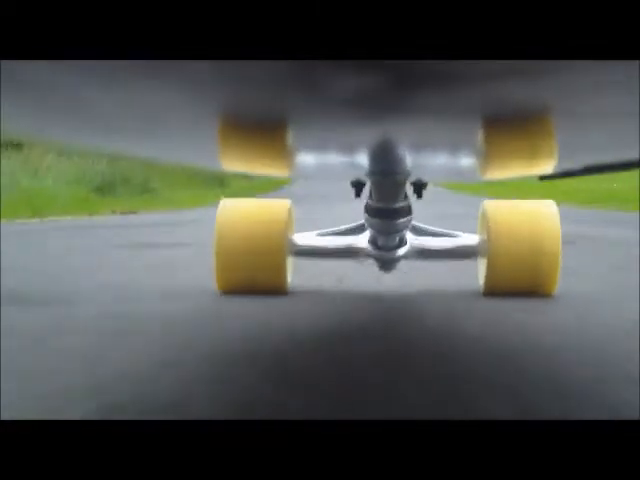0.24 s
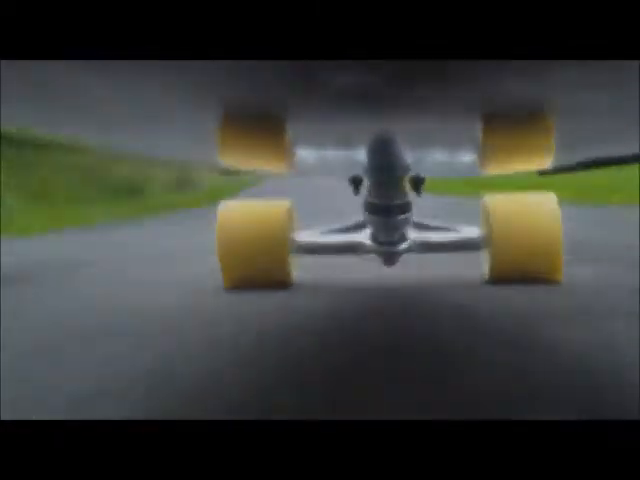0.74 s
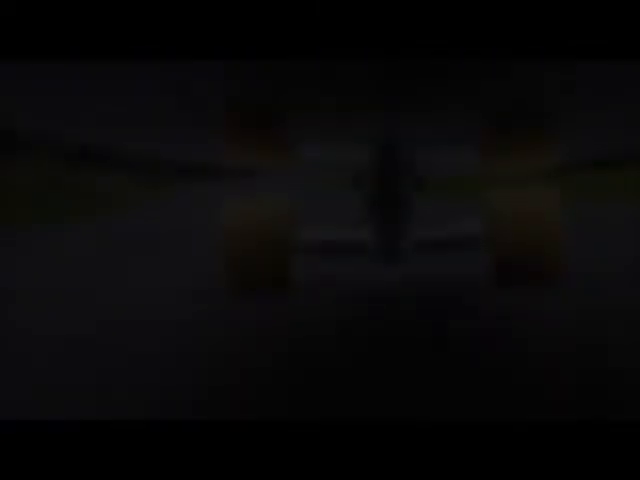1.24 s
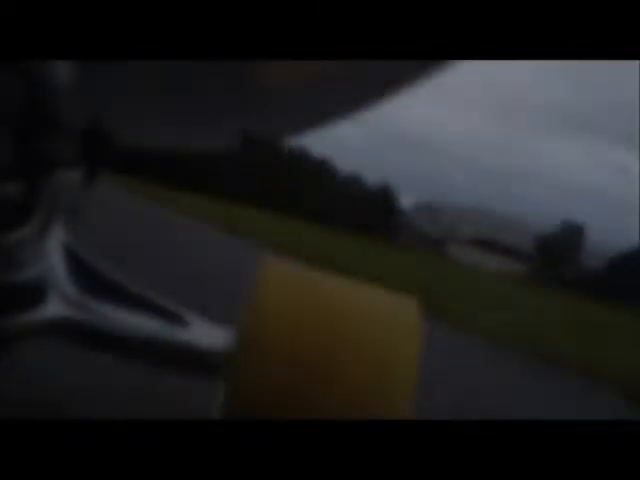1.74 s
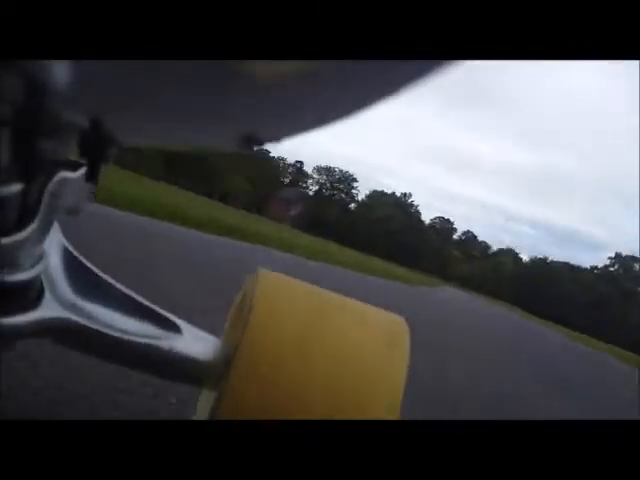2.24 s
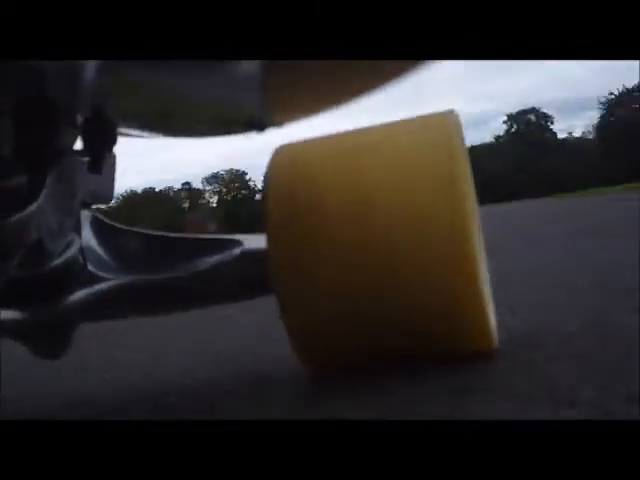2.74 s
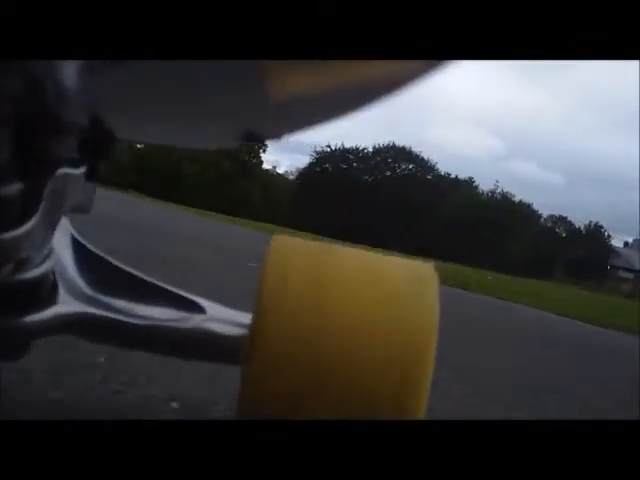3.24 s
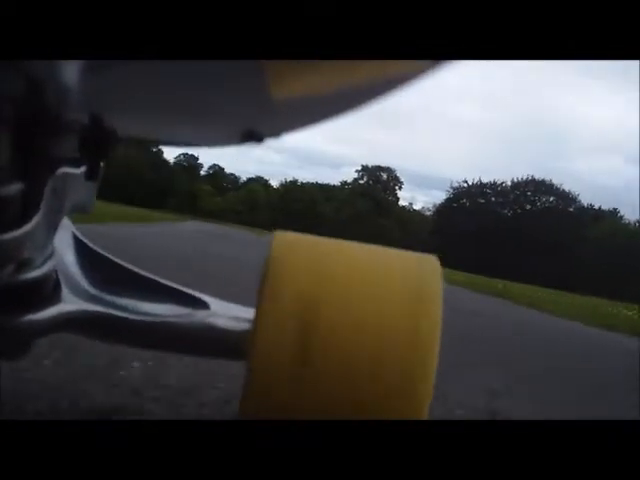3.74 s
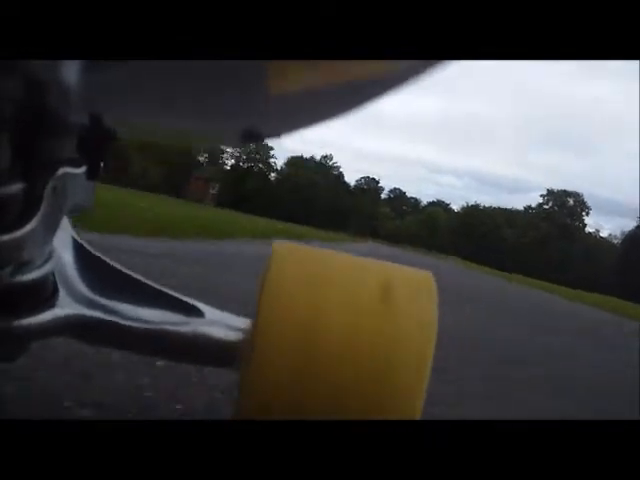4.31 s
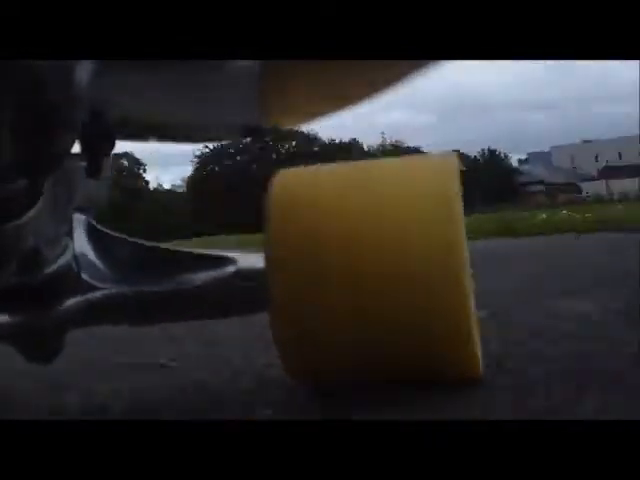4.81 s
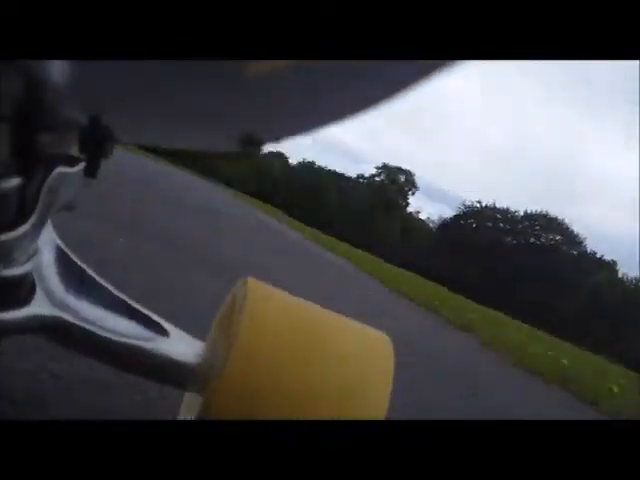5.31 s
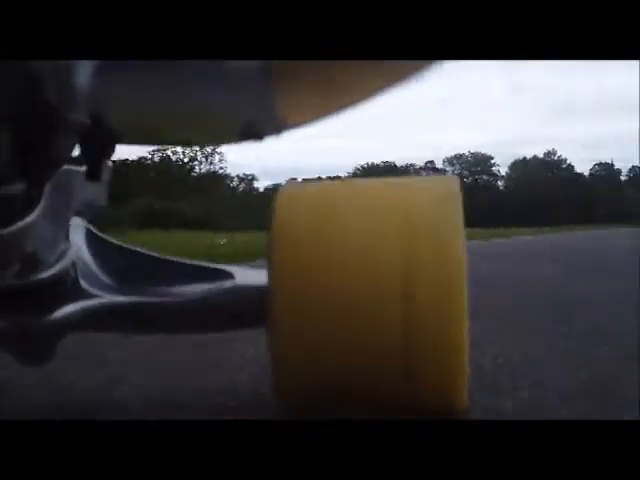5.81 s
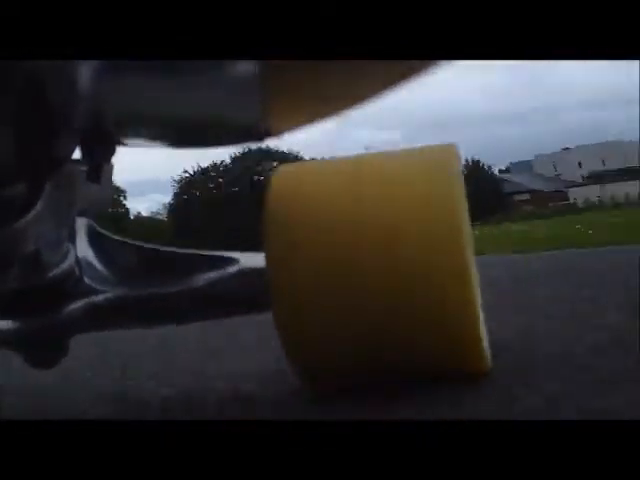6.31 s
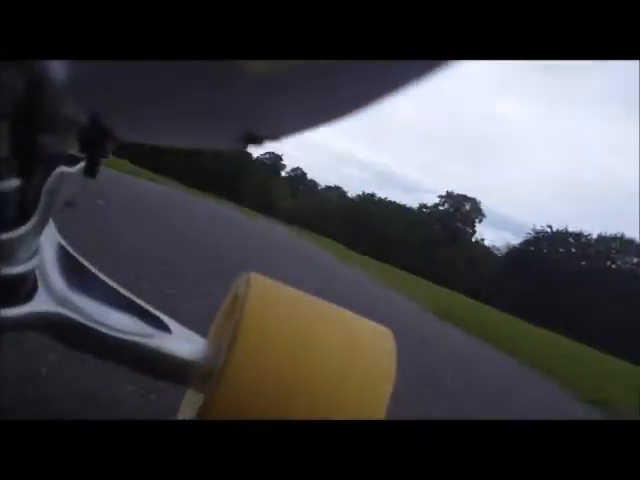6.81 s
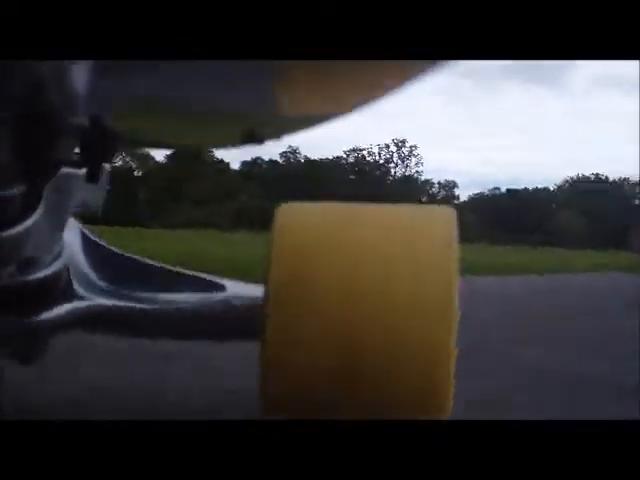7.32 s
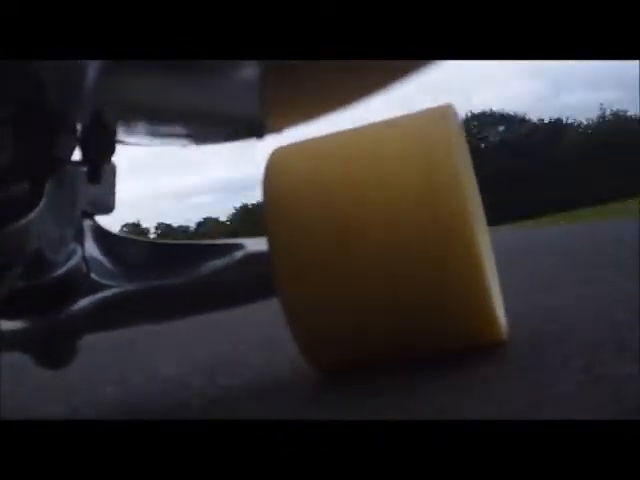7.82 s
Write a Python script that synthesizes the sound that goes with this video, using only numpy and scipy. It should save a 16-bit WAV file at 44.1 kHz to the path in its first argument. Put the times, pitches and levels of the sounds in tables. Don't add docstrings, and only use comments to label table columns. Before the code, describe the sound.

A close, rough rolling roar of a skateboard on pavement, knocking over bumps, then turning duller and surging in waves as it carves.

```python
import sys
import numpy as np
from scipy import signal
from scipy.fft import rfft, irfft
from scipy.io import wavfile

SR = 44100
rng = np.random.default_rng(int(sys.argv[2]) if len(sys.argv) > 2 else 0)


def rack_gain(trim_db):
    fader = np.asarray(trim_db, float)
    return 10 ** (fader / 20)


def materialize(psi):
    bounded = np.clip(np.atleast_2d(psi).T, -1, 1)
    quanta = np.round(bounded * 32767).astype(np.int16)
    wavfile.write(sys.argv[1], SR, quanta)


N = 355446
TIME_S = np.arange(N) / SR
UNDER_DECK = TIME_S < 2.179

# f/Hz, width/Hz, level/dB
DECK_RING_UNDER = [(132.6, 21, -2), (147.6, 25.6, -3), (211.7, 43, -9), (235, 18, -5.5), (299, 150, -10)]
# f/Hz, width/Hz, level/dB
DECK_RING_BESIDE = [(131.6, 39.5, -2.5), (159.8, 67, -1), (204, 86, -3.5), (300, 100, -10.5)]
# f/Hz, width/Hz, level/dB
TRUCK_RING_UNDER = [(375, 38.5, -3.5), (449.5, 47, -2), (547, 75, -5), (710, 120, -11.5), (816, 190, -15.5)]
# f/Hz, width/Hz, level/dB
TRUCK_RING_BESIDE = [(418, 190, -4.5), (548, 150, 2), (691, 383, -5.5)]


def rms_one(x):
    return x / np.sqrt(np.mean(x ** 2) + 1e-20)


def in_time(rows):
    s, *columns = np.transpose(rows)
    return [np.interp(TIME_S, s, c) for c in columns]


def at_hz(points, hz):
    f, db = np.transpose(points)
    return np.interp(np.log(hz), np.log(f), db)


def drift(rate_hz):
    r = np.exp(-80 * np.pi * rate_hz / SR)
    noise = rng.standard_normal(N // 40 + 2002)
    slow = signal.lfilter([1], [1, -2 * r, r * r], noise)[2000:]
    return np.interp(np.arange(N) / 40, np.arange(len(slow)), rms_one(slow))


def band(x, low_hz, high_hz):
    sos = signal.butter(2, [low_hz, min(high_hz, 19000)], "band", fs=SR, output="sos")
    return signal.sosfilt(sos, x)


def resonance(x, hz, width_hz):
    r = np.exp(-np.pi * width_hz / SR)
    gain = (1 - r * r) / 2
    return signal.lfilter(np.array([1, 0, -1]) * gain, [1, -2 * r * np.cos(2 * np.pi * hz / SR), r * r], x)


def body(push, modes):
    total = 0
    for k, (hz, width_hz, db) in enumerate(modes):
        total = total + (-1) ** k * rack_gain(db) * resonance(push, hz, width_hz)
    return total


def stones(per_s, spread_db):
    sizes = rack_gain(spread_db * np.minimum(rng.exponential(1, N), 5))
    signs = rng.choice([-1, 1], N)
    hits = rng.random(N) < per_s / SR
    return rms_one(sizes * signs * hits)


def by_mount(under, beside):
    return np.where(UNDER_DECK, rms_one(under), rms_one(beside))


def mount_db(under_db, beside_db):
    return np.where(UNDER_DECK, under_db, beside_db)


def board(flex_db, truck_db, scrape_db, coarse):
    # f/Hz, width/Hz, level/dB
    scrape_under = [(840, 270, 3), (1204, 236, 3), (1400, 127, 3), (2210, 300, -8)]
    # f/Hz, width/Hz, level/dB
    scrape_beside = [(945, 114, 13.5), (1306, 750, 3)]
    road = stones(2200.0, 2.95) * rack_gain(0.5 * coarse)
    low = band(road, 65.0, 305.0)
    mid = band(road, 244.0, 988.0)
    fine_contacts = 3.7 * stones(2500.0, 2.8)
    high = band(road + fine_contacts, 715.0, 4200.0) * rack_gain(1.4 * drift(46.0))
    flex = by_mount(body(low, DECK_RING_UNDER), body(low, DECK_RING_BESIDE))
    truck = by_mount(body(mid, TRUCK_RING_UNDER), body(mid, TRUCK_RING_BESIDE))
    scrape = by_mount(body(high, scrape_under), body(high, scrape_beside))
    rasp = rms_one(band(high, 1570.0, 2430.0)) * ~UNDER_DECK
    rasp_db = -39.0 + 1.26 * (scrape_db + 34.0)
    ringing = rack_gain(flex_db) * flex + rack_gain(truck_db) * truck
    return ringing + rack_gain(scrape_db + 3.0) * scrape + rack_gain(rasp_db) * rasp


def grit(hiss_db, bright_db, coarse):
    # f/Hz, level/dB
    colour_under = [(1200, -4), (1900, -9.5), (3300, -6), (4300, -9), (5000, -12), (6500, -3), (9000, -3.5),
                    (10500, -1.5), (12500, -11.5), (15000, -17)]
    # f/Hz, level/dB
    colour_beside = [(1200, -27), (2000, -13), (3500, -10.5), (4400, -13), (5100, -14.5), (6200, -10.5),
                     (9000, -8.5), (10500, -8), (12500, -13), (15000, -21)]
    under, beside = 0, 0
    edges_hz = 1400 * 2 ** np.arange(0, 3.7, 1 / 4)
    grains = [stones(14000.0, 3.35) for _ in range(2)]
    shake_db = 0.6 * coarse + 1.3 * drift(45.0)
    for k, (low, high) in enumerate(zip(edges_hz, edges_hz[1:])):
        hz = np.sqrt(low * high)
        tilt_db = bright_db * np.clip(np.log2(hz / 5140.0), 0, 2)
        hiss = band(grains[k % 2], low, high) * rack_gain(tilt_db + 0.54 * drift(4.7))
        under = under + hiss * rack_gain(at_hz(colour_under, hz))
        beside = beside + hiss * rack_gain(at_hz(colour_beside, hz))
    return rack_gain(hiss_db + 5.0 + shake_db) * by_mount(under, beside)


def bumps():
    # t/s, peak level/dB, push (1 up, -1 down)
    bump_list = [(0.0408, -3.1, 1), (0.14, -1.7, -1), (0.3786, -2.8, 1), (0.5973, -3.0, -1),
                 (1.1363, -1.6, -1), (1.4093, -4.1, -1), (2.0043, -0.5, 1), (2.1389, -1.1, -1),
                 (2.3063, -8.3, -1), (2.3958, -8.3, -1), (2.6105, -3.0, -1), (3.0598, -4.3, -1),
                 (3.2832, -3.2, -1), (3.7784, -6.0, -1), (3.8867, -5.1, 1), (3.9335, -5.8, -1),
                 (4.3603, -5.5, 1), (4.6169, -6.3, 1), (5.7626, -7.2, -1), (5.8234, -6.6, -1),
                 (6.3317, -4.7, 1), (6.4169, -5.6, -1), (6.8702, -2.4, 1), (6.9221, -2.8, -1),
                 (7.0308, -3.5, 1), (7.1771, -8.2, -1), (7.6197, -4.0, -1), (7.6581, -3.7, -1),
                 (7.7191, -3.5, -1), (7.8362, -5.1, 1)]
    push = np.full(N, 1e-18)
    for s, peak_db, direction in bump_list:
        push[round(s * SR)] = rack_gain(peak_db - 3.0) * np.sign(direction)
    push = np.convolve(push, np.hanning(72))[:N]
    push = signal.sosfilt(signal.butter(2, 110.0, "high", fs=SR, output="sos"), push)
    ring_under = body(push, [*DECK_RING_UNDER, *TRUCK_RING_UNDER])
    ring_beside = body(push, [*DECK_RING_BESIDE, *TRUCK_RING_BESIDE])
    return push + rack_gain(-1.5) * np.where(UNDER_DECK, ring_under, ring_beside)


def ticks():
    # t/s, knock level/dB, crack level/dB
    tick_list = [(0.0844, -35, -33), (0.13, -19, -29), (0.68, -32, -29), (0.8034, -7, -32),
                 (0.855, -20, -34), (1.0076, -18, -13), (1.0644, -36, -29), (1.297, -29, -26),
                 (1.329, -17, -16), (1.9494, -35, -30), (2.646, -38, -19), (2.6773, -23, -13.5),
                 (2.7115, -16, -36), (2.934, -14, -32), (2.9944, -14, -30), (3.059, -16, -32),
                 (4.716, -16, -41), (4.753, -20, -41), (4.8573, -18, -56), (5.8856, -13.5, -41),
                 (6.1554, -16, -37), (6.382, -14, -42), (6.416, -16, -44), (6.5566, -16, -37),
                 (6.7017, -8, -34), (7.298, -20, -43), (7.5587, -18, -37), (7.715, -24, -33),
                 (7.834, -13, -30), (7.902, -20, -35)]
    length = 900
    out, t = np.zeros(N + length), np.arange(length) / SR
    for s, knock_db, crack_db in tick_list:
        noise = rng.standard_normal(length)
        burst = (noise + 4 * (t == 0)) * np.exp(-t / 0.0011)
        rattle = burst + rack_gain(-14) * noise * np.exp(-t / 0.0075)
        layers = [
            (knock_db - 4.0, band(rattle, 600.0, 2200.0)),
            (knock_db - 5.0, band(rattle, 2200.0, 4300.0)),
            (crack_db + 8.5, band(np.gradient(burst), 7600.0, 11000.0)),
            (crack_db - 2.0, band(burst, 12000.0, 16000.0)),
        ]
        at = round(s * SR)
        for db, part in layers:
            out[at:at + length] += rack_gain(db) * part / np.abs(part).max()
    return out[:N]


def whine():
    # t/s, level/dB
    bearing_level = [(0.03, -47), (1.0, -46), (2.2, -57), (3.1, -49), (3.4, -43.5), (4.4, -46.5),
                     (4.9, -61), (5.2, -46), (6.2, -62), (6.8, -42), (7.2, -63), (8.04, -58)]
    whine_db, = in_time(bearing_level)
    tone = rng.standard_normal(N) * rack_gain(2.2 * drift(25.0))
    for _ in range(2):
        tone = resonance(tone, 5800, 700)
    return rack_gain(whine_db) * rms_one(tone)


def wind():
    # t/s, level/dB
    air_level = [(0.06, -53), (0.88, -50), (1.0, -36), (1.66, -40), (2.21, -29), (2.39, -48), (2.79, -30),
                 (3.75, -37), (3.93, -29), (4.55, -32), (4.7, -22.5), (4.99, -45), (5.13, -31), (5.66, -31),
                 (6.15, -35), (7.15, -30), (7.35, -43), (8.04, -29)]
    wind_db, = in_time(air_level)
    lumps = band(rng.standard_normal(N), 53.0, 210.0) * rack_gain(0.33 * drift(12.0))
    return rack_gain(wind_db + 3.0) * rms_one(lumps)


def patches():
    # centre t/s, length/s, deck/dB, tread/dB
    patch_list = [(0.042, 0.11, -5.5, -2), (0.2, .2, 0, 0.5), (0.29, 0.15, 0, 2.5),
                  (0.45, 0.21, -1.5, -1.5), (0.806, 0.035, 1.5, 2), (0.87, 0.11, 4.5, 0),
                  (1.017, 0.12, 6.5, 4.5), (1.134, 0.22, 1, 7.5), (1.25, .08, 2.5, 3),
                  (1.313, 0.084, 5, 9.5), (1.594, 0.2, 1.5, 0.3), (1.826, 0.087, 4.5, 3),
                  (2.145, 0.043, 2, 1.5),
                  (2.52, 0.35, -2, 0.5), (2.76, 0.17, 4, 3), (3.06, 0.1, 2, 3), (3.17, 0.11, -3.5, 2.5),
                     (3.42, 0.084, 4, 0), (3.65, 0.062, -5, -4), (3.7, 0.047, 2, 1), (4.05, 0.052, -10, -3),
                     (4.385, 0.094, 9.5, 8), (4.456, .07, 11, 4), (4.53, 0.036, 6, 6), (4.63, 0.11, 2, 2.5),
                     (4.73, 0.046, -11, 4), (4.92, 0.055, 0.1, 3), (5.01, 0.2, 4, 0),
                     (5.15, 0.041, -2.5, 8), (5.33, 0.12, -1.5, 4), (5.43, 0.079, 0, 3),
                     (5.53, 0.066, 4, 5), (5.87, 0.083, 1.5, 1.5), (6.5, 0.13, -2, -1.5),
                     (6.7, 0.035, 4, 2), (6.86, 0.059, 4.5, 7), (7.0, 0.28, 4, 4), (7.152, 0.056, -4, 2),
                     (7.3, 0.026, -1.5, 2), (7.56, 0.056, 7.5, 4), (7.598, 0.035, -16, -2),
                     (7.69, .1, 8, 1.5), (7.835, 0.037, 9, 0)]
    out = np.zeros((2, N))
    for s, length_s, *db in patch_list:
        passed = (TIME_S - s) / max(length_s, 0.01) + 0.47
        rise, fall = passed / 0.32, (1 - passed) / 0.54
        out += np.outer(db, np.clip(np.minimum(rise, fall), 0, 1))
    return out


def seam():
    since_s = TIME_S - 7.131
    return -4 * (since_s > 0) * np.exp(-np.abs(since_s) / 0.26)


def scene():
    # t/s, level/dB
    road_level = [(0.03, 2), (0.62, -0.5), (0.74, 1.5), (1.33, -2), (1.38, -3), (2.17, 2.5), (2.25, -1.5),
                  (2.77, 0.5), (3.85, 0.5), (4.1, -3), (5.0, -6.5), (5.2, 0), (5.72, -4), (6.2, 0.5),
                  (7.12, -0.5), (7.42, -8.5), (7.66, -1), (8.04, -3)]
    # t/s, level/dB
    carve_level = [(1.1, -1), (2.17, 2), (2.25, -3), (2.5, -7.5), (2.77, 0.5), (3.3, 3.5), (3.65, -2.5),
                   (4.15, -2), (4.9, 3), (5.05, -1.5), (5.3, 7), (5.54, 7), (5.72, -4), (6.0, 1), (6.92, 4),
                   (7.15, -5.5), (7.7, 6), (8.04, 1.5)]
    # t/s, amount/dB, fineness/dB
    dust_level = [(0.03, -1, -2.5), (1.15, 0, -2.5), (1.5, -0.5, -2.5), (2.17, 1, 0.5), (2.25, -2, -1),
                  (2.7, 0, 0.5), (3.05, 3.5, 0), (3.15, -2.5, 2), (3.85, 0.5, -1.5), (4.8, -0.5, 1),
                  (5.0, -2, 0), (5.7, 0, 0.5), (6.35, 5, -1.5), (6.5, 0.5, -2), (6.95, 3, 2),
                  (7.2, -1.5, -3.5), (7.82, 7, 2.5), (8.04, 3, 2)]
    # t/s, level/dB
    stance_level = [
        (0.2, -0.5),
        (0.85, 0),
        (1.3, 1.5),
        (2.0, -1),
        (2.9, 1.4),
        (3.55, -1.5),
        (4.8, 0.2),
        (6.3, 0.7),
        (6.97, -2),
    ]
    (road_db,), (carve_db,), (stance_db,) = in_time(road_level), in_time(carve_level), in_time(stance_level)
    dust_db, fine_db = in_time(dust_level)
    deck_db, tread_db = patches()
    seam_db = seam()
    road_db = road_db + seam_db
    tread_db = tread_db + seam_db

    flex_db = mount_db(-17, -19.5) + road_db + deck_db + stance_db
    truck_db = mount_db(-18, -23.5) + 0.9 * road_db + 0.37 * carve_db
    truck_db = truck_db + 0.25 * tread_db + 0.44 * deck_db - stance_db
    scrape_db = mount_db(-34.5, -37.5) + 0.56 * road_db + carve_db + tread_db
    hiss_db = mount_db(-33, -41.5) + 0.55 * road_db + dust_db + 0.65 * tread_db
    bright_db = fine_db - 0.2 * tread_db

    coarse = drift(58.0)
    rolling = board(flex_db, truck_db, scrape_db, coarse) + grit(hiss_db, bright_db, coarse)
    ride = rolling + bumps() + ticks()
    return (ride + whine() + wind())[None]


def band_limit(x):
    return signal.sosfilt(signal.butter(12, 15320, fs=SR, output="sos"), x)


def record(dry):
    hz = np.arange(N // 2 + 1) * SR / N
    rounded = 1.4 * np.tanh(dry / 1.142)
    openings = np.abs(np.cos(np.pi / 2 * hz / 11240)) ** 0.99 + 0.0005
    top_cut = np.where(hz < 15290, 1, 0.001)
    mix = irfft(rfft(rounded) * openings * top_cut, N)
    return band_limit(mix)


dry = scene()
out = record(dry)
materialize(out)
```